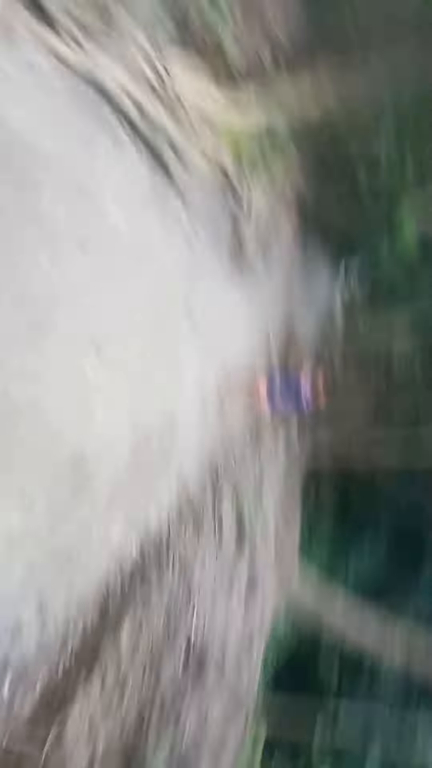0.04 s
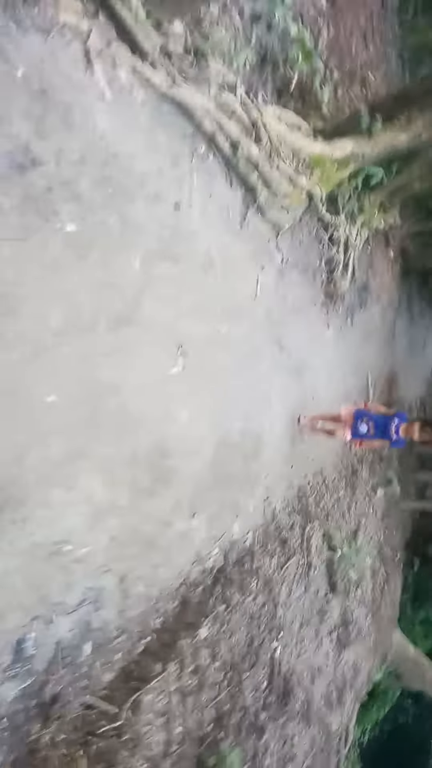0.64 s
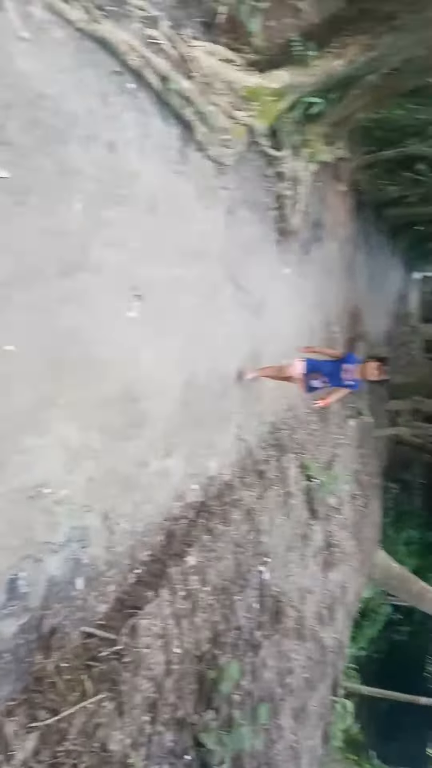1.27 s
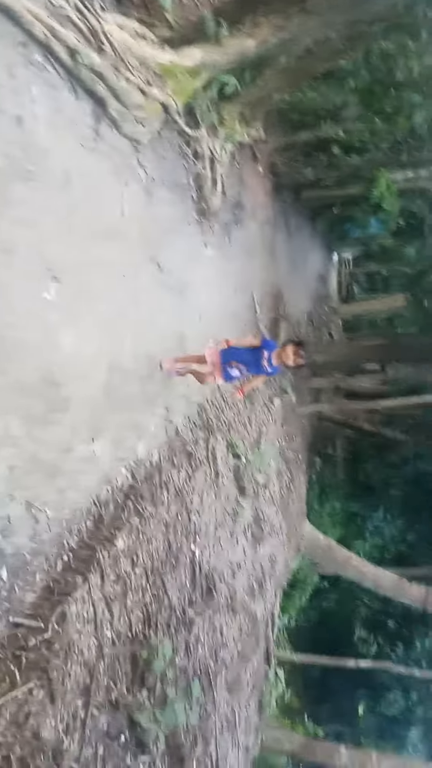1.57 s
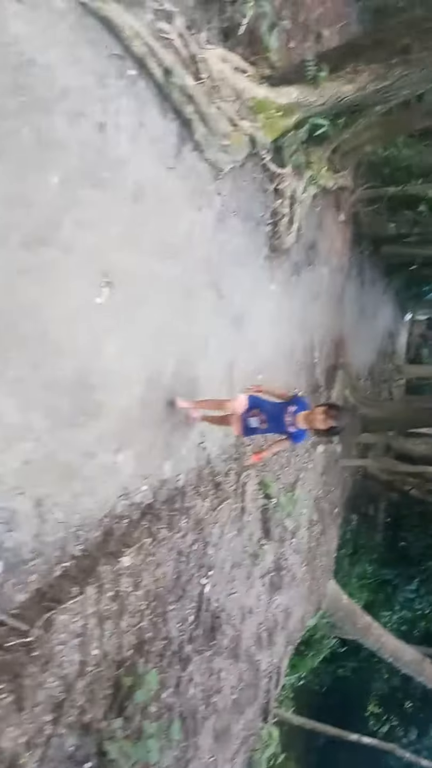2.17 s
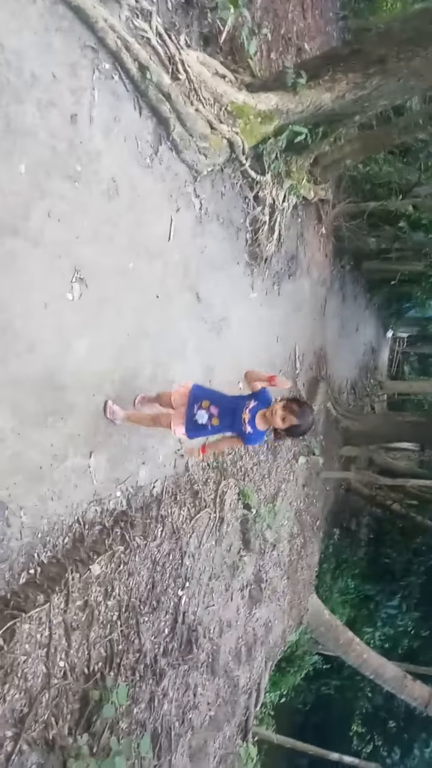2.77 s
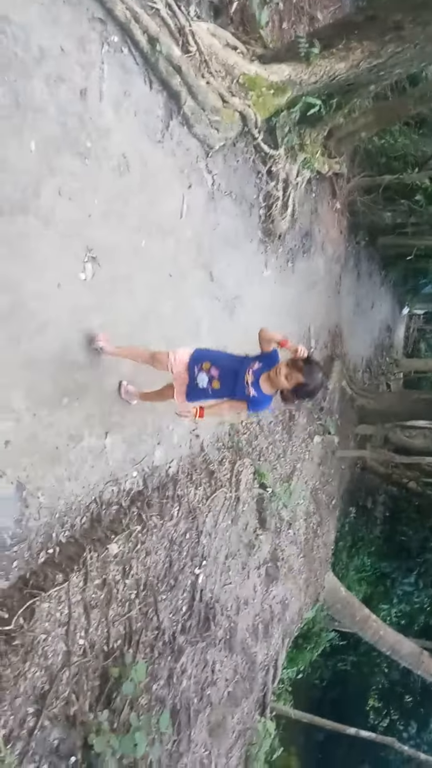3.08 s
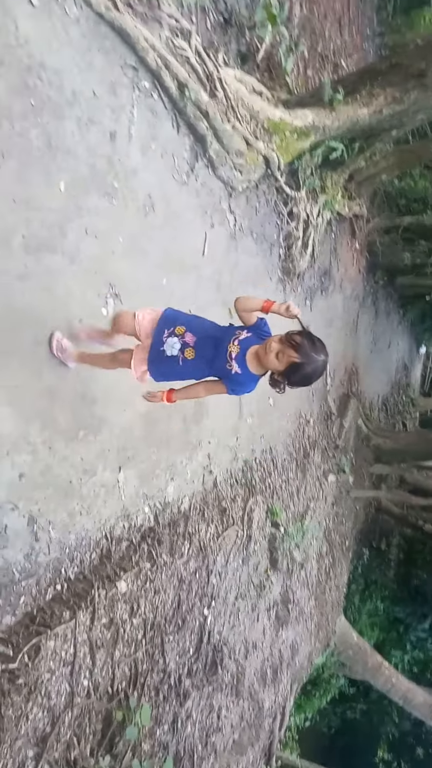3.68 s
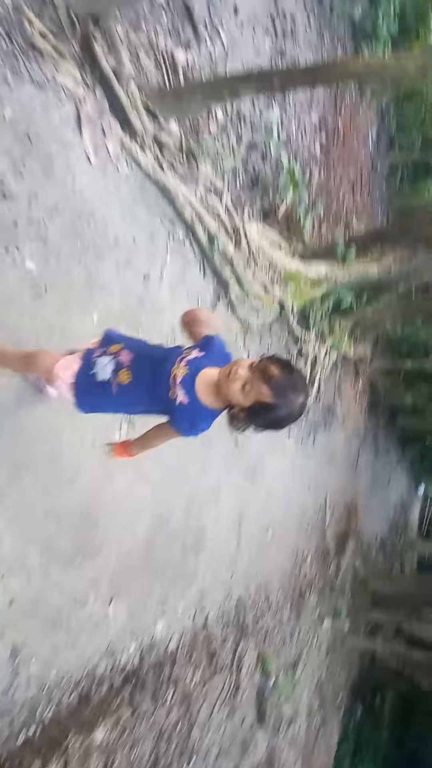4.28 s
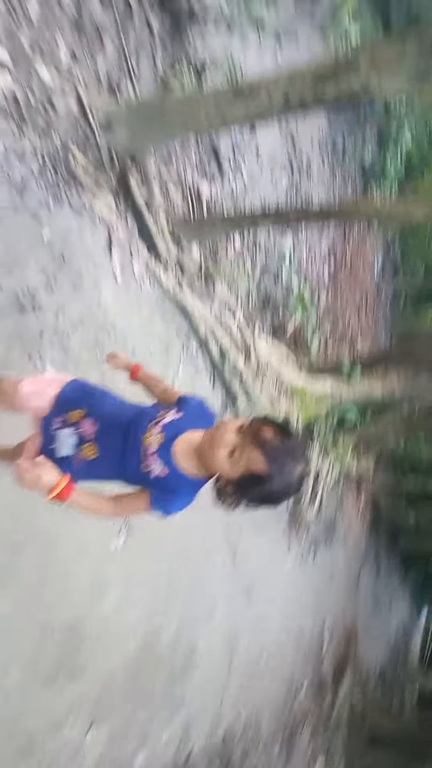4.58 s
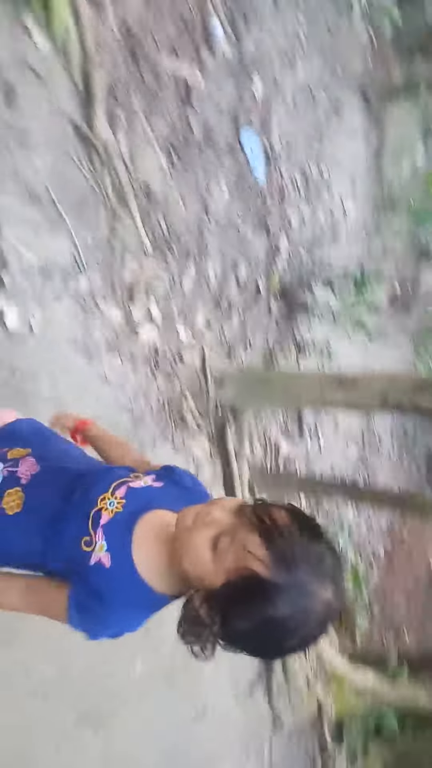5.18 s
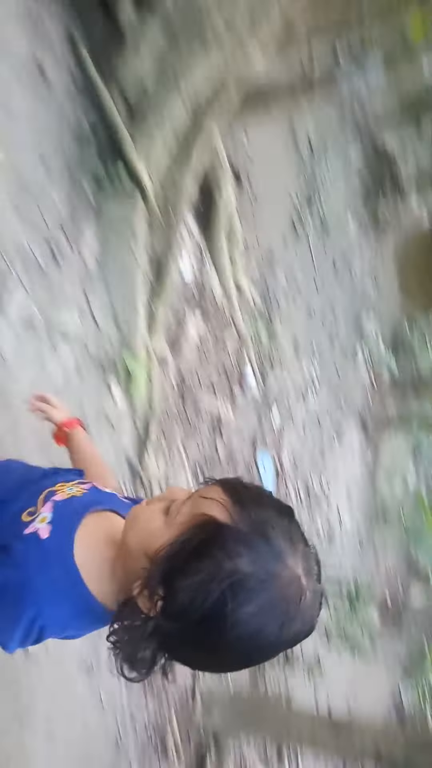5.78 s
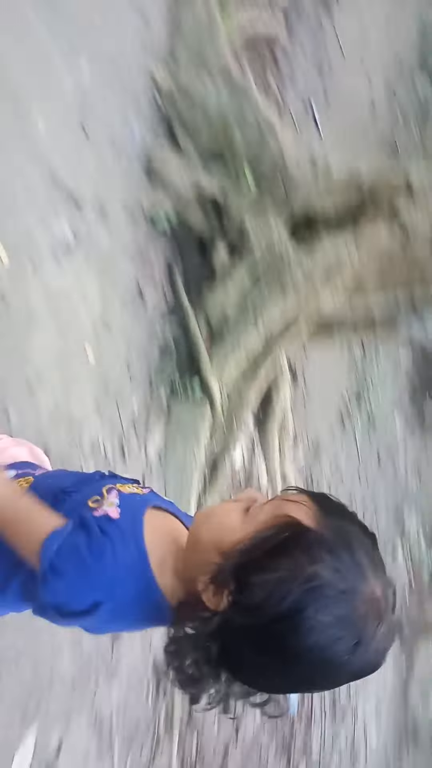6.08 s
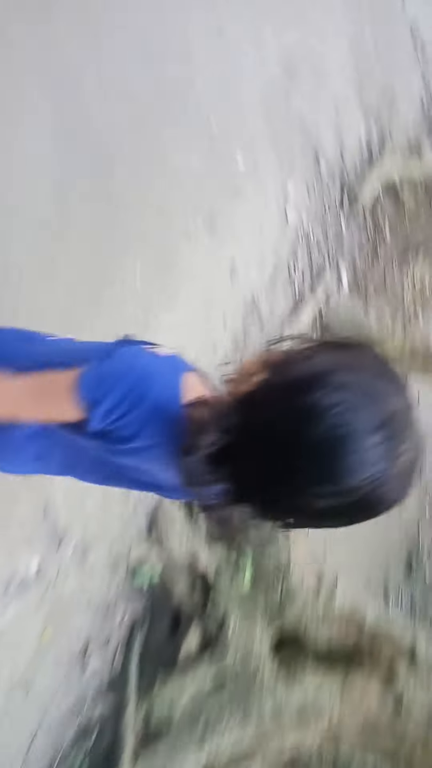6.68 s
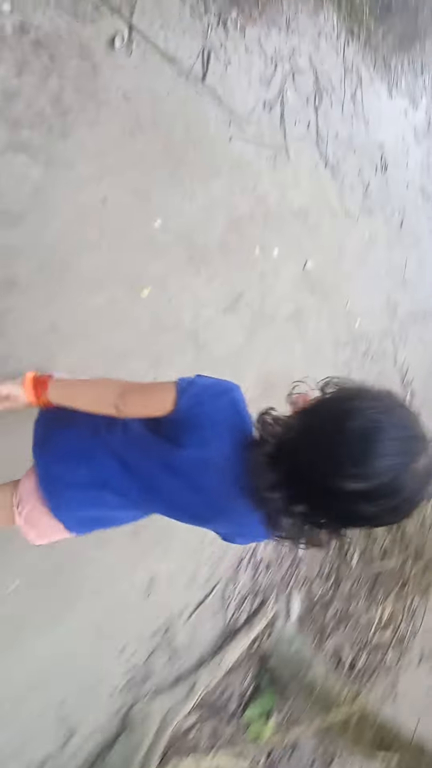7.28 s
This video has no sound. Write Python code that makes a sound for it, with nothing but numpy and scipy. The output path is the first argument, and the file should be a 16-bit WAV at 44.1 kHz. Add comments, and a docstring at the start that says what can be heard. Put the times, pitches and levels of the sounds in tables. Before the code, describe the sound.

The setting is a quiet wood, with distant birds chirping and whistling, their calls echoing over a faint hush of leaves and thin, high insect trills. At about 0.2 seconds a phone case ticks sharply right at the microphone, and fingers rub softly on it through the first second. A few low puffs of air bump the microphone between 0.5 and 0.9 seconds. A small child's sandals are barely heard at first, with faint, isolated slaps and scuffs on packed dirt from around 2 to 4 seconds. From about 5 seconds the steps come closer and louder, each a light slap with a gritty scrape, roughly three a second, loudest between 6.3 and 7.4 seconds. More puffs of air thump now and then, and from about 6.2 seconds they build into a low, gusty rumble that peaks near 7 seconds and continues to the end at 7.5.

```python
"""Small sandals on a woodland path

A small child walks up a packed dirt path and passes close to a hand-held phone. Each sole
slaps, pops the air under it and crunches grit. Far birds echo among the trunks over faint
insects and leaves. Fingers rub the phone and its case ticks once. Puffs of air bump the
microphone and build to a low rumble as the phone swings round."""
import sys
import numpy as np
from scipy import signal
from scipy.fft import rfft, irfft, next_fast_len
from scipy.io import wavfile
from scipy.ndimage import uniform_filter1d

SR = 44100
rng = np.random.default_rng(int(sys.argv[2]) if len(sys.argv) > 2 else 0)


def file_out(sig):
    """Save sig as 16-bit WAV at sys.argv[1]."""
    # one column per channel
    cols = np.atleast_2d(sig).T
    # limit, then scale
    lim = np.clip(cols, -1, 1)
    pcm = np.round(lim * 32767).astype(np.int16)
    wavfile.write(sys.argv[1], SR, pcm)


N = 332514
T = np.arange(N) / SR
LEAD_S = .015  # a sole brushes the ground this long before it lands

# Sandal slaps: start_s, level_db, sole_hz, pocket_hz, thud_db, pop_db, grit_db
# (the last three are relative to the sole's ring)
SLAPS = [(.281, -73.5, 1870, 806, -3, -8, -8), (2.379, -65.5, 2280, 920, -20, 8.5, 4.5),
         (3.598, -63.5, 2180, 880, -25, -1, -2), (4.092, -69, 1900, 814, -19, -15, -1),
         (4.344, -60.5, 2020, 880, -0.5, 4.5, -3), (4.848, -74, 2160, 553, -5, -4.5, 7),
         (5.068, -66, 2040, 570, -11, -4, -4), (5.1, -49.5, 1800, 750, -3.5, -8, -3.5),
         (5.618, -58.5, 1810, 1340, -13, -0.5, -22), (5.88, -50.5, 1970, 695, -14, -2, -6.5),
         (6.009, -69, 2020, 1260, -27, -18, -9), (6.275, -42, 2060, 663, -10, -5, -2),
         (6.394, -56, 1860, 1260, -30, -3.5, 1.5), (6.654, -44.5, 2210, 636, -10, -11.5, -12),
         (6.752, -70, 2340, 587, -18, -14, -3), (7.006, -51, 2300, 565, -3, -19, -5),
         (7.116, -52.5, 2130, 970, -33, -34, -7), (7.386, -41, 2060, 570, -12, -8, -15)]
# Tone of crushed grit: pitch_hz, gain_db
GRIT_TONE = [(400, -4), (1200, -1), (2500, -2), (3700, 1), (4800, -3), (6300, 4.5), (7200, -5.5),
             (9000, -7), (16000, -1)]
# The microphone loses most of the highest treble: pitch_hz, gain_db
MIC_TONE = [(20, -3), (7000, -1), (7400, -8.5), (8000, -16), (9500, -23), (13700, -33), (15000, -20.5),
            (16000, -28.5)]


def undb(db):
    """Turn decibels into a gain to multiply by."""
    return 10 ** (np.asarray(db) / 20)


def unit(x):
    """Scale x to an average (rms) level of 1."""
    return x / np.sqrt(np.mean(x ** 2) + 1e-20)


def add(out, start_s, x):
    """Mix x into out at the given time."""
    i = int(np.clip(start_s * SR, 0, N - 1))
    out[i:i + len(x)] += x[:N - i]


def colour(x, points):
    """Shape the tone of x along a curve of (pitch_hz, gain_db) points."""
    size = next_fast_len(len(x) + 4096)
    hz, db = np.transpose(points)
    bin_hz = np.arange(size // 2 + 1) * SR / size
    gain = undb(np.interp(np.log(bin_hz + 1), np.log(hz), db))
    # folding the cepstrum keeps the filter from ringing before a sound starts
    cepstrum = irfft(np.log(gain), size)
    cepstrum[1:size // 2] *= 2
    cepstrum[size // 2 + 1:] = 0
    return irfft(rfft(x, size) * np.exp(rfft(cepstrum)), size)[:len(x)]


def ring(x, hz, width_hz):
    """Make x ring at one pitch; a narrower width rings longer."""
    return signal.lfilter(*signal.iirpeak(hz, max(hz / width_hz, .7), fs=SR), x)


def wander(rate_hz, size=N):
    """A smooth random drift, roughly between -1 and 1."""
    hold = max(int(SR / rate_hz), 2)
    stairs = np.repeat(rng.standard_normal(size // hold + 1), hold)
    return 1.312 * uniform_filter1d(stairs, hold)[:size]


def grains(size, per_s, spread_db):
    """Random clicks, mostly small and a few large."""
    hit = rng.random(size) < per_s / SR
    sign = rng.choice([-1, 1], size)
    return unit(hit * sign * undb(spread_db * np.minimum(rng.exponential(size=size), 3)))


def swell(length_s):
    """A rounded rise and fall."""
    return np.sin(np.linspace(0, np.pi, max(int(length_s * SR), 64)))


def trunk_echoes(x, fade_s, gap_s, per_s):
    """Scattered echoes from tree trunks, fainter with distance: down 60 dB after fade_s."""
    t = T[:SR]
    echoes = grains(SR, per_s, 3.8) * undb(-60 * t / fade_s) * (t > gap_s)
    return signal.fftconvolve(x, echoes / np.linalg.norm(echoes))[:N]


def hollow(x, nearest_s=.0009, farthest_s=.0022, bounce=.5):
    """A quick bounce off the ground or a leg hollows the sound, differently each time."""
    lag = int(np.clip(SR * rng.uniform(nearest_s, farthest_s), 1, len(x) // 2))
    return (x + bounce * np.pad(x, (lag, 0))[:len(x)]) / np.hypot(1, bounce)


def wood(level_db=-67.5, sway_db=1.5):
    """Far rumble and a hush of leaves that sways gently with the breeze."""
    # Tone of the hush: pitch_hz, gain_db
    hush_tone = [(25, -18.5), (60, 3.5), (160, 5.5), (240, -4), (380, -7.5), (1300, -11), (2000, -9.5),
                 (2600, -19), (3700, -14.5), (4800, -17), (6200, -10), (7200, -15.5), (9000, -15.5),
                 (16000, -4)]
    level = undb(level_db + sway_db * wander(4.006))
    return level * unit(colour(colour(rng.standard_normal(N), hush_tone), MIC_TONE))


def insects(trill_hz=80, chirp_hz=10150, answer_hz=10620, answer_db=-4):
    """Bouts of very high trills over a pulsing shrill, a thin whine and a soft shimmer."""
    # Bouts of chirping: start_s, end_s, period_s, level_db
    bouts = [(1.049, 2.3, .27, -90), (3.646, 3.9, .17, -87), (6, 7.4, .36, -93)]

    def hiss(size, hz, width_hz):
        return unit(ring(ring(ring(rng.standard_normal(size), hz, width_hz), hz, width_hz), hz, width_hz))
    shrill = undb(2.9 * wander(11)) * hiss(N, 7180, 300)
    whine = undb(-18) * hiss(N, 8900, 400)
    shimmer = undb(-95 + 2 * wander(5)) * hiss(N, 10290, 1300)
    out = undb(-81) * (shrill + whine) + shimmer
    for start, end, period, db in bouts:
        shape = swell(.7 * period)
        trill = shape * (1 + 0.51 * np.sin(2 * np.pi * trill_hz * T[:len(shape)]))
        for s in np.arange(start, end, period):
            add(out, s, undb(db) * unit(trill * hiss(len(trill), chirp_hz, 760)))
            answer = unit(trill * hiss(len(trill), answer_hz, 500))  # a second insect
            add(out, s + period / 2, undb(db + answer_db) * answer)
    return out


def whistle(length_s, start_hz, end_hz, waver=0.01896, rasp_hz=20):
    """One gliding, wavering bird note, quick to start; low notes are the hoarsest."""
    shape = np.sqrt(np.abs(swell(length_s)))
    size = len(shape)
    shape *= np.linspace(1, .4, size)
    hz = np.linspace(start_hz, end_hz, size) * (1 + waver * wander(109.3, size))
    hz += rasp_hz * wander(130, size)
    return unit(shape * np.sin(2 * np.pi * np.cumsum(hz) / SR))


def birds(count=800, fall=0.0593, fall_spread=0.0795, high_share=.07, high_ratio=1.65):
    """Nearer whistles over a chorus of far, mostly falling chirps, all heard mainly by their echoes."""
    # The clearest notes: start_s, length_s, start_hz, end_hz, level_db
    clear_notes = [(.12, 0.12, 880, 883, -69.5), (0.217, .12, 2010, 1776, -69), (.44, .11, 2460, 2570, -73),
                   (0.624, .22, 2396, 2696, -73), (0.857, .12, 6180, 6280, -60.5),
                   (1.447, 0.066, 3530, 3650, -57.5), (1.5, 0.18, 4220, 4300, -73.5),
                   (1.731, 0.064, 3030, 2440, -70.5), (2.12, .05, 2960, 2800, -68),
                   (2.15, 0.092, 1186, 1134, -71.5), (2.211, 0.14, 3624, 3764, -69.5),
                   (2.612, 0.091, 3677, 3797, -58.5), (2.933, .1, 3723, 3655, -63.5),
                   (3.177, 0.4, 1360, 1392, -73.5), (3.52, 0.25, 1426, 1445, -68.5),
                   (4.151, .16, 406, 442, -65.5), (5.34, 0.122, 5990, 5910, -65.5),
                   (6.87, 0.33, 6080, 6070, -66.5), (6.954, 0.063, 2940, 3030, -63),
                   (7.028, 0.24, 943, 895, -69.5), (7.442, 0.12, 2970, 2950, -66.5)]
    # The chorus deep in the wood: time_s, level_db, middle_hz
    chatter = [(0, -60, 1600), (.3, -78.5, 1934), (1.1, -73.5, 3297), (1.85, -70.5, 3280),
               (2.75, -66.5, 3554), (3.6, -73.5, 3398), (4.25, -79.5, 2797), (4.601, -76, 3210),
               (5.2, -100.5, 3136), (5.45, -71.5, 3250), (5.901, -87.5, 3070), (7.54, -70.5, 3104)]
    notes, chorus = np.zeros(N), np.zeros(N)
    for s, length, start_hz, end_hz, db in clear_notes:
        add(notes, s - .005, undb(db) * whistle(length, start_hz, end_hz))
    times, chorus_db, middle_hz = np.transpose(chatter)
    traits = rng.standard_normal((count, 3))
    sings_high = rng.random(count) < high_share
    for s, (pitch, glide, stretch), high in zip(np.linspace(0, T[-1], count), traits, sings_high):
        # many small birds near one pitch, fewer large ones well below it
        octaves = .32 * (pitch - .25 * pitch ** 2 + 0.246)
        hz = np.interp(s, times, middle_hz) * 2 ** octaves * high_ratio ** high
        end_hz = hz * (1 - fall + fall_spread * glide)
        add(chorus, s + .01 * stretch, whistle(.045 * 1.3 ** stretch, hz, end_hz))
    calls = notes + unit(chorus) * undb(np.interp(T, times, chorus_db))
    return 0.71 * calls + 0.85 * trunk_echoes(calls, fade_s=0.43, gap_s=.004, per_s=1500)


def wind(puff_hz=83.8, puff_half_s=0.012, wake_db=-16, wake_stretch=2.4, eddy_hz=250, eddy_db=-10):
    """Puffs bump the microphone and stir the air; streaming air rumbles, brighter when it is fast."""
    # Air streaming past as the phone swings round: time_s, level_db
    airflow = [(6.1, -66.5), (6.25, -56), (6.31, -45.5), (6.4, -64), (6.55, -58), (6.62, -39), (6.72, -49),
               (6.86, -40), (6.94, -31.5), (7.06, -40.5), (7.14, -57), (7.26, -42), (7.39, -53),
               (7.44, -40.5), (7.54, -55)]
    # Single puffs: time_s, half_length_s, peak_db
    puffs = [(0.519, 0.0066, -49), (0.709, 0.0089, -27), (0.778, 0.036, -40.5), (0.895, 0.024, -38.5),
             (2.32, 0.016, -55), (3.002, .045, -54), (3.914, .016, -41.5), (5.17, 0.01, -44.5),
             (5.388, 0.01, -34), (5.987, 0.0072, -36), (6.469, 0.014, -41), (6.648, 0.0085, -28),
             (6.745, .004, -22.5), (6.766, 0.0035, -25)]
    # Tone of the rumble: pitch_hz, gain_db
    rumble_tone = [(20, -40.5), (40, -6), (65, 2), (115, 3), (175, -3), (220, -20), (330, -35.5),
                   (500, -58), (900, -69)]
    flow = undb(np.interp(T, *np.transpose(airflow), left=-78))
    bumps = np.zeros(N)
    t = T[:SR // 5] - .1
    for s, half_s, db in puffs:
        hz = puff_hz * (puff_half_s / half_s) ** 0.11  # larger puffs are deeper
        skewed_t = t * (1 - 0.19 * np.tanh(t / half_s))  # quick to arrive, slow to leave
        shape = undb(db) * np.exp(-(skewed_t / half_s) ** 2)
        add(bumps, s + t[0], shape * np.sin(2 * np.pi * (hz * skewed_t + rng.random())))
        wake = undb(db + wake_db) * np.exp(-np.abs(T - s) / (wake_stretch * half_s))
        flow = np.maximum(flow, wake)
    rumble = unit(colour(rng.standard_normal(N), rumble_tone))
    rumble /= np.sqrt(uniform_filter1d(rumble ** 2, SR // 16))  # even out chance swells
    eddies = unit(ring(ring(ring(rng.standard_normal(N), eddy_hz, 120), eddy_hz, 120), eddy_hz, 110))
    return bumps + flow * (rumble + undb(eddy_db) * eddies * flow / flow.max())


def friction(slides, tone, slips_per_s):
    """Surfaces rubbing: each slide is a swell of tiny slips."""
    out = np.zeros(N)
    for s, length, db in slides:
        shape = swell(length)
        slips = colour(grains(len(shape), slips_per_s, spread_db=2.0), tone)
        add(out, s, undb(db) * unit(shape * hollow(slips)))
    return out


def fingers():
    """Fingers slide on the phone."""
    # Finger slides: start_s, length_s, level_db
    rubs = [(.06, 0.16, -56), (.285, 0.075, -51.5), (.32, .15, -55), (.47, 0.15, -55.5), (.56, 0.18, -64.5),
            (.82, 0.054, -56), (.96, 0.044, -60)]
    # Tone of the rubbing: pitch_hz, gain_db
    rub_tone = [(300, -11), (1500, -0.5), (2500, -2.5), (5000, -6.5), (6400, 6.5), (9000, -5.5),
                (16000, 2.5)]
    return friction(rubs, rub_tone, slips_per_s=10000)


def case_tick(start_s=.171, level_db=-25.5):
    """The phone case snaps once under the grip, right at the microphone."""
    # Tone of the snap: pitch_hz, gain_db
    tick_tone = [(300, -26), (750, -24), (1150, -6.5), (1800, -15), (2700, -11.5), (4300, -9), (5400, -4.5),
                 (6700, 1), (9000, -5.5), (16000, 0.5)]
    out = np.zeros(N)
    add(out, start_s, undb(level_db) * unit(colour(signal.unit_impulse(SR // 100), tick_tone)))
    return out


def scuffs(drag_delay_s=.008, drag_s=0.071):
    """Soles scrape the dirt and ring; each slap ends in a drag, louder after a hard one."""
    # Sole brushes on the dirt, most just before a slap, a few between steps: start_s, length_s, level_db
    brushes = [(0, 0.032, -51), (1.86, 0.089, -61.5), (3.3, 0.046, -62.5), (4.31, 0.041, -57.5),
               (4.67, 0.055, -62), (5.07, 0.065, -52), (5.575, .045, -63), (6.365, 0.034, -59),
               (6.95, 0.17, -55.5), (7.31, .061, -64)]
    drags = [(s + drag_delay_s, drag_s, -53 + 2.5 * (db + 39.5)) for s, db, *_ in SLAPS]
    scrape = friction(brushes + drags, GRIT_TONE, slips_per_s=1400)
    return 0.83 * scrape + 1.13 * ring(scrape, 2170, 500)


def slap(sole_hz, pocket_hz, thud_db, pop_db, grit_db, thud_hz=385):
    """Heel, then ball, thud on the dirt and pop a pocket of air; the sole rings and settles on grit."""
    # Rings of a sole: multiple_of_sole_hz, width_hz, level_db
    sole_rings = [(0.531, 170, 0.5), (0.659, 160, 0), (.82, 180, -4), (0.999, 263, 12.5), (1.3, 200, -8.5),
                  (1.719, 300, -8), (2.85, 400, -32)]
    t = T[:SR // 8] - LEAD_S
    after = np.maximum(t, 0)
    ball_s = .003 * rng.uniform(.7, 1.3)
    brush = undb(-24) * np.exp(-np.abs(t) / 0.014)
    hits = sum((t > s) * np.exp(-np.abs(t - s) / 0.0022) for s in (0, ball_s))
    settle = undb(-11) * (t > 0) * np.exp(-after / 0.012)
    contacts = grains(len(t), 9000, 1.7) * (hits + settle + brush)
    heel = np.exp(-(t / 0.000092) ** 2)
    ball = 0.29 * np.exp(-((t - ball_s) / 0.00016) ** 2)
    push = heel + ball + 0.05 * contacts
    thud = ring(ring(push, thud_hz, 300), thud_hz, 380)
    pop = ring(ring(push, pocket_hz, pocket_hz * 0.21), pocket_hz, pocket_hz * 0.5)
    sole = sum(undb(db) * ring(contacts, sole_hz * ratio, width) for ratio, width, db in sole_rings)
    crush = (1 - np.exp(-after / 0.00092)) * np.exp(-after / 0.013)
    crunch = grains(len(t), 2500, 4.4) * (crush + brush)
    # a few larger stones chink at pitches of their own
    stones = sum(ring(crunch, hz, 100) for hz in rng.uniform(3304, 6910, size=4))
    grit = colour(crunch + undb(9) * stones, GRIT_TONE)
    body = undb(thud_db) * unit(thud) - undb(pop_db) * unit(pop)
    return body + hollow(unit(sole) + undb(grit_db) * unit(grit))


def footsteps():
    """Every slap of the sandals, each with its own level and tone."""
    out = np.zeros(N)
    for s, db, *tone in SLAPS:
        add(out, s + 0.001014 - LEAD_S, undb(db) * slap(*tone))
    return out


def scene():
    """Feet, hand and wind close by; birds, insects and leaves around them."""
    feet_and_hand = scuffs() + footsteps() + fingers()
    echoes = undb(-15) * trunk_echoes(feet_and_hand, fade_s=0.11, gap_s=.006, per_s=2500)
    near = colour(feet_and_hand + case_tick() + echoes, MIC_TONE)
    return (near + birds() + insects() + wind() + wood())[None]


def record(dry, low_cut_hz=43, high_cut_hz=15900):
    """The phone cuts the deepest bass and the very top."""
    thin = signal.sosfilt(signal.butter(3, low_cut_hz, "high", fs=SR, output="sos"), dry)
    return signal.sosfilt(signal.ellip(8, .2, 70, high_cut_hz, fs=SR, output="sos"), thin)


dry = scene()
out = record(dry)
file_out(out)
```